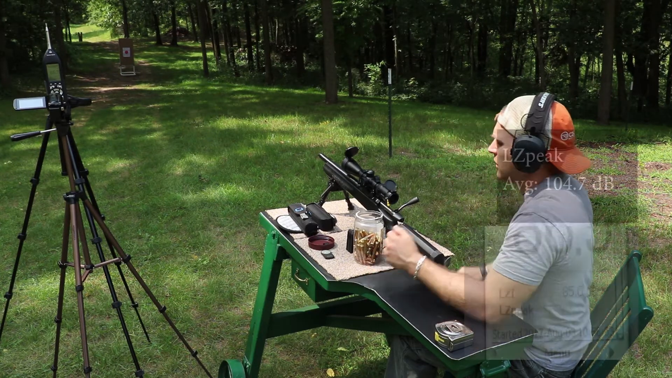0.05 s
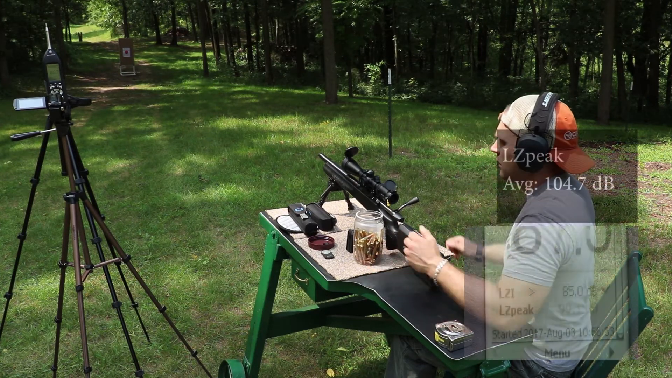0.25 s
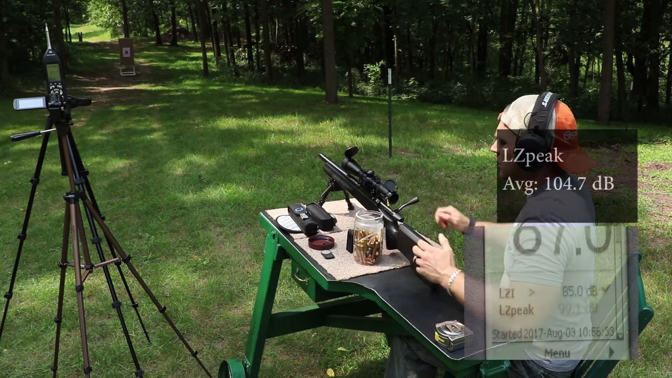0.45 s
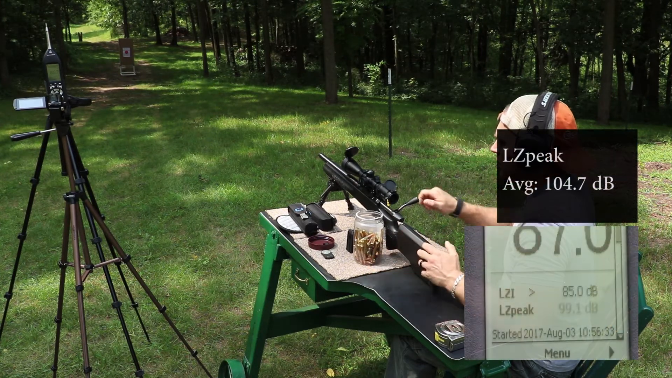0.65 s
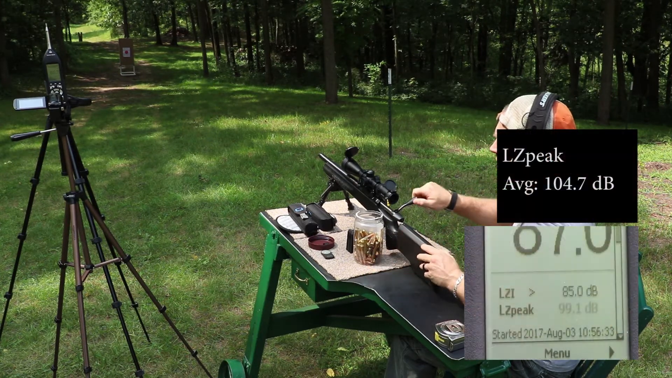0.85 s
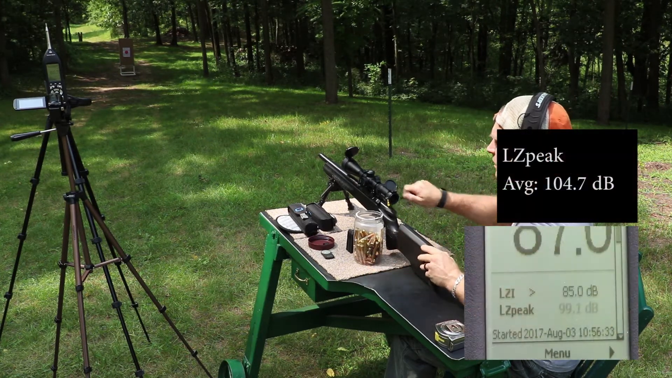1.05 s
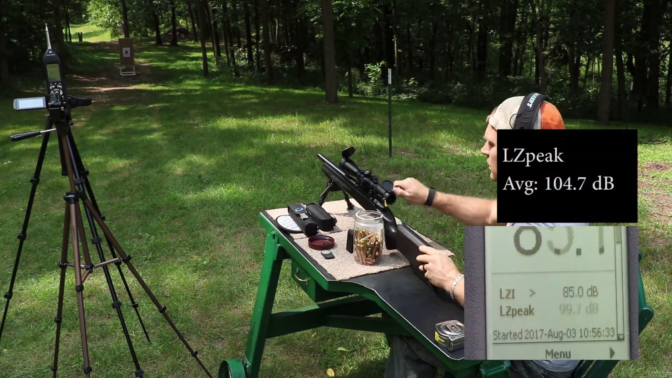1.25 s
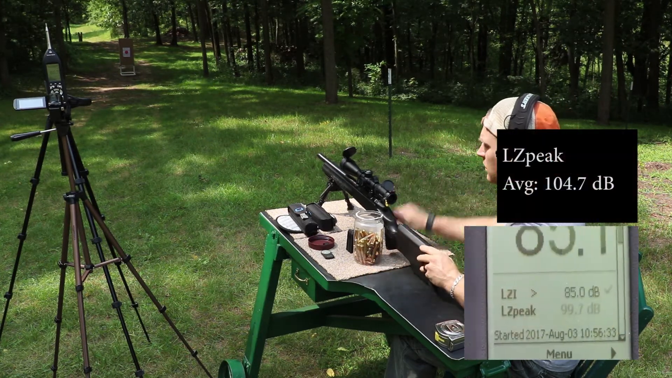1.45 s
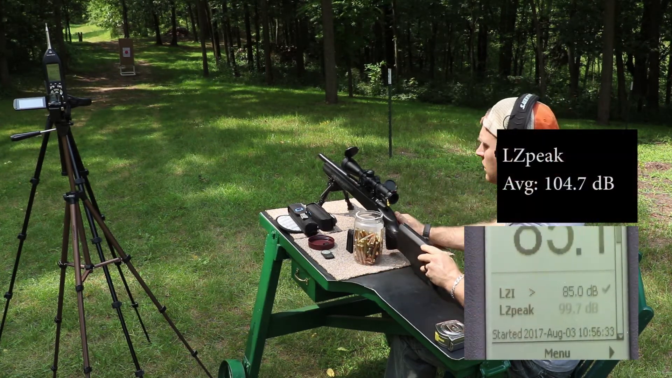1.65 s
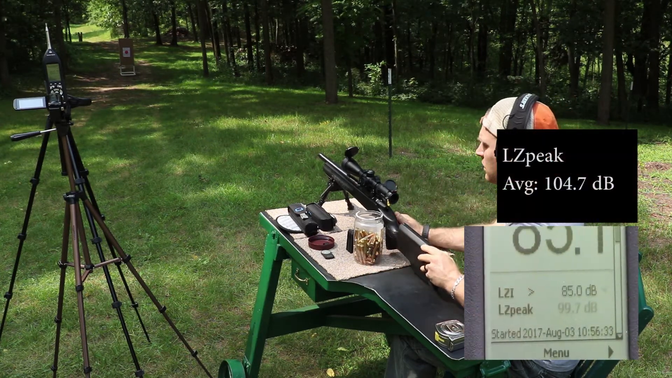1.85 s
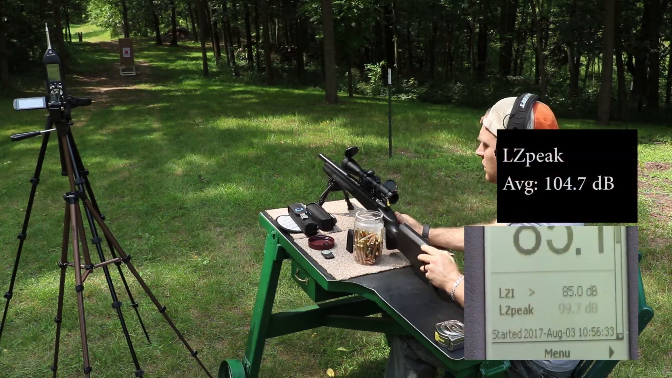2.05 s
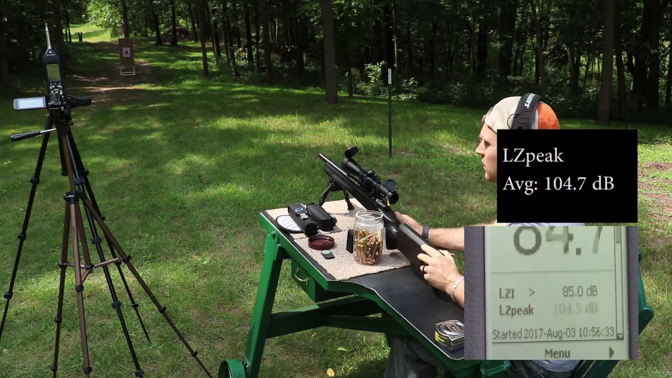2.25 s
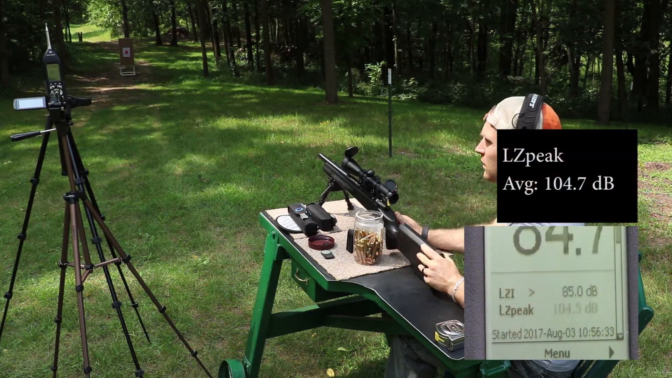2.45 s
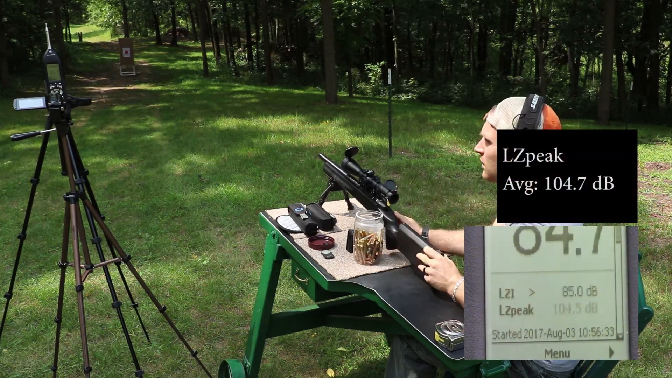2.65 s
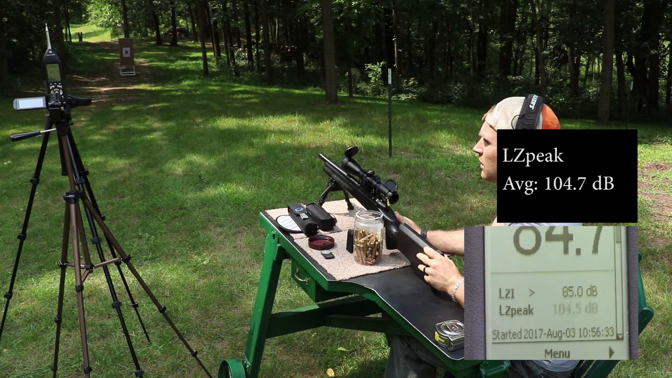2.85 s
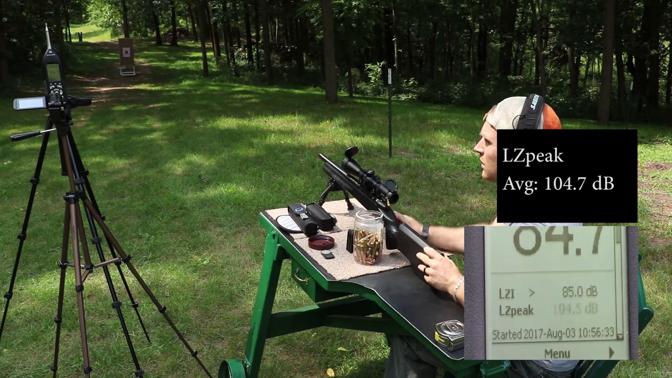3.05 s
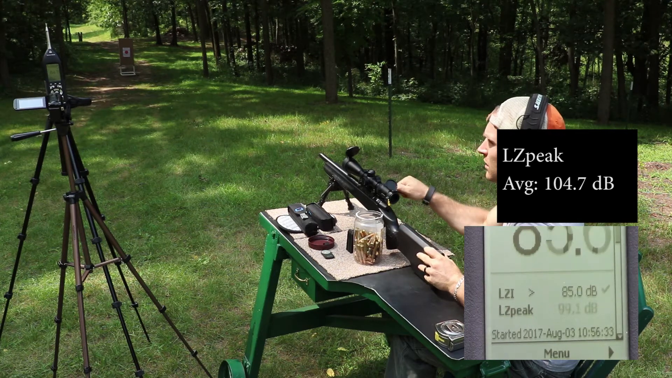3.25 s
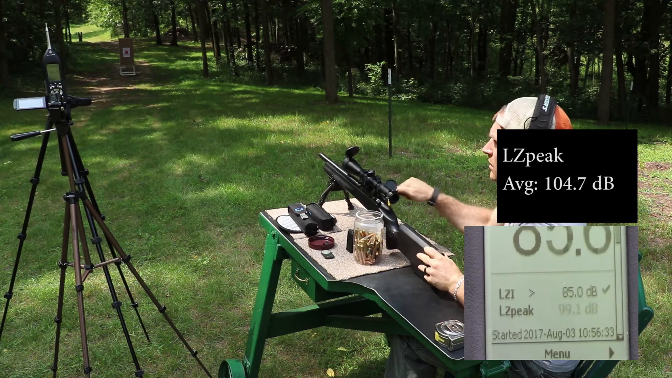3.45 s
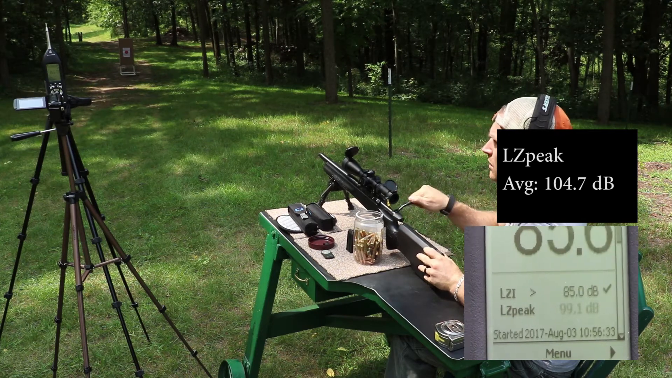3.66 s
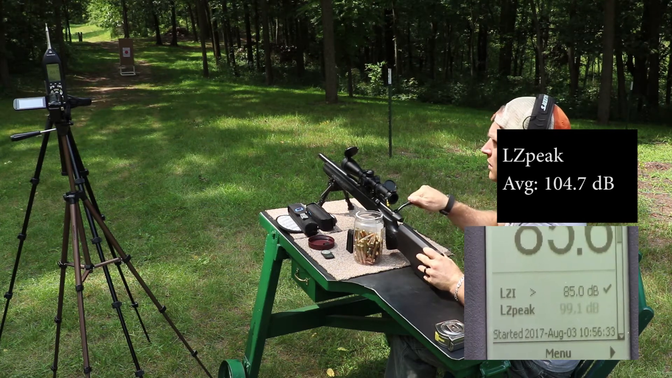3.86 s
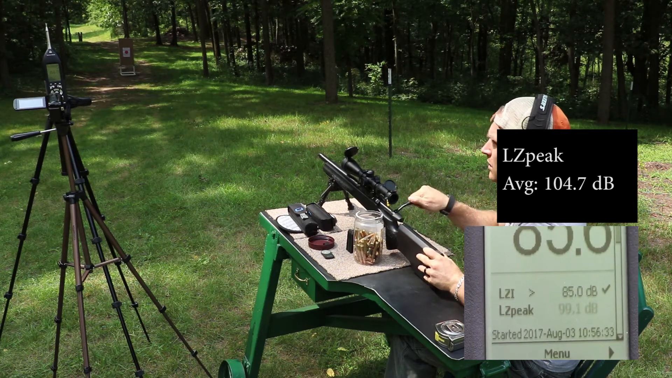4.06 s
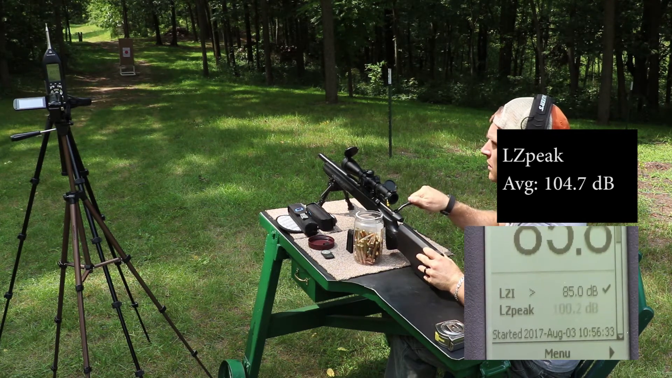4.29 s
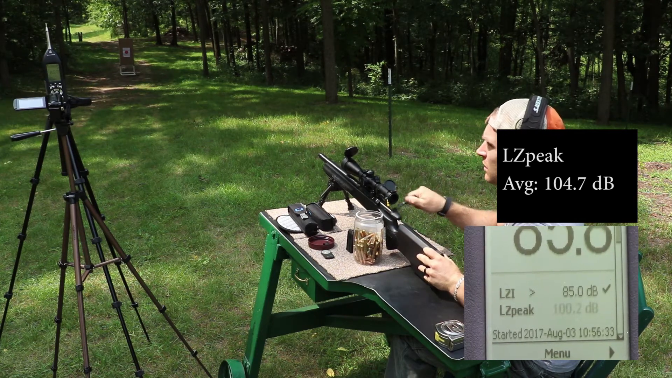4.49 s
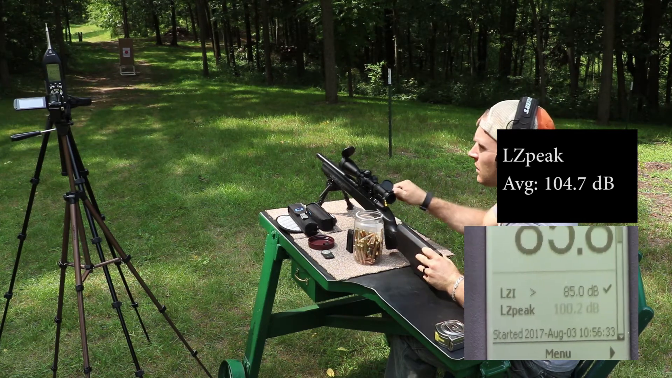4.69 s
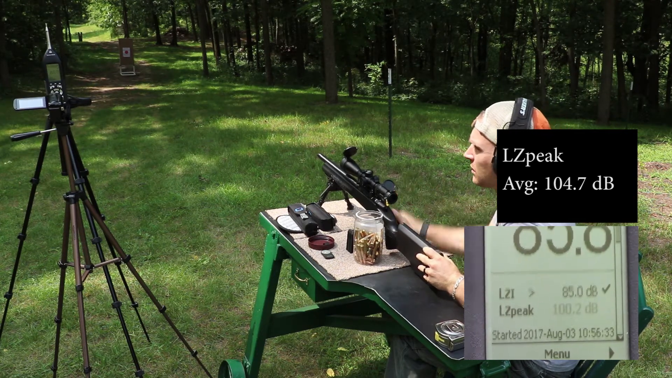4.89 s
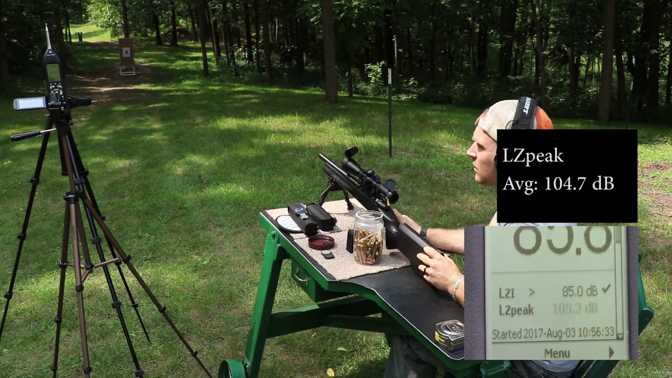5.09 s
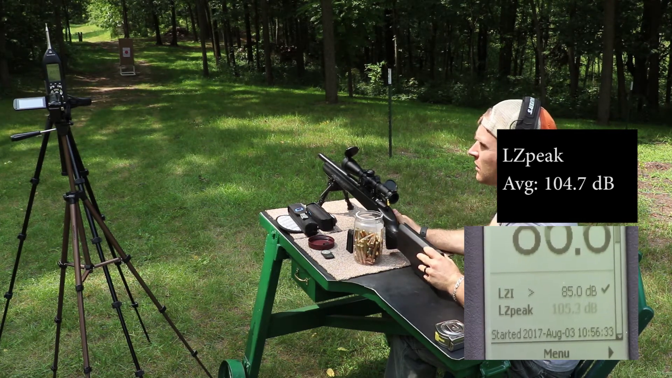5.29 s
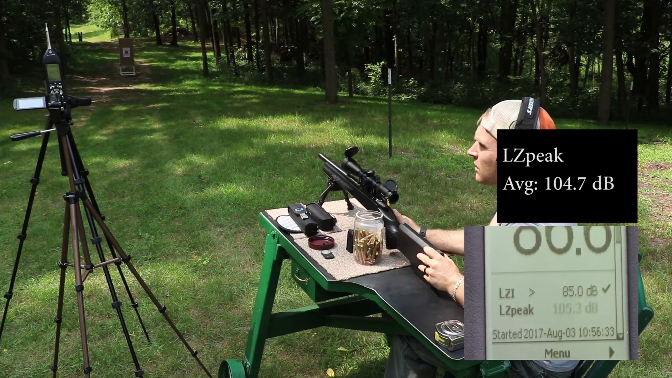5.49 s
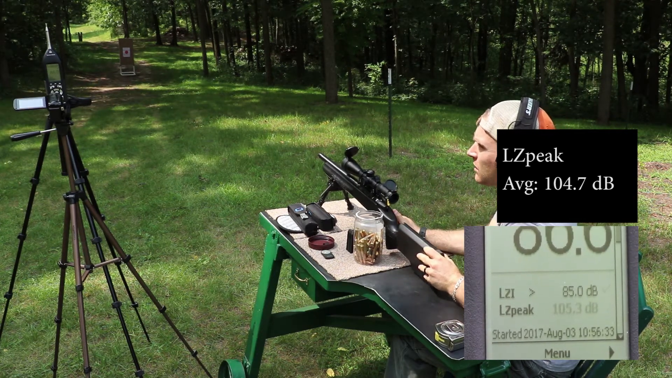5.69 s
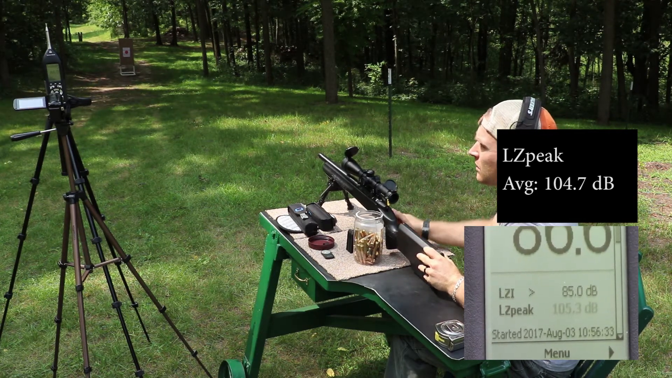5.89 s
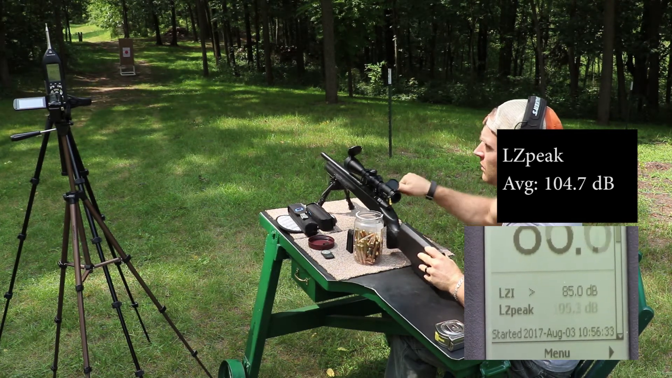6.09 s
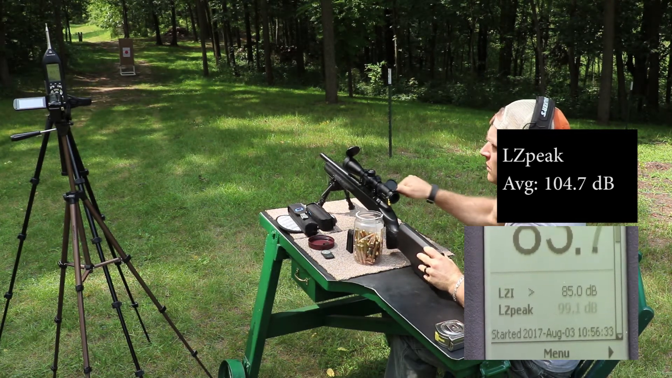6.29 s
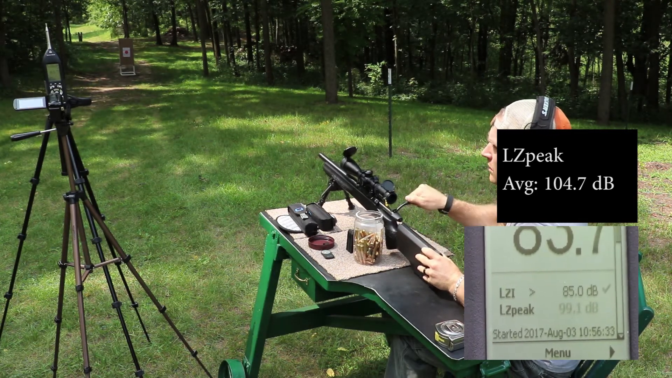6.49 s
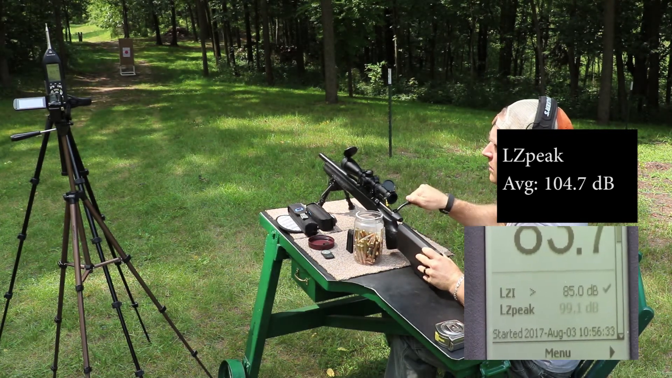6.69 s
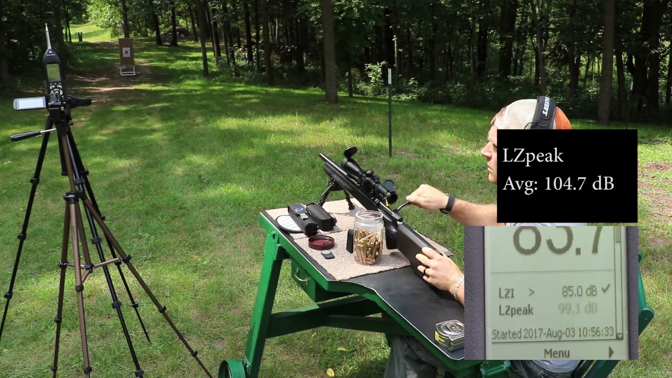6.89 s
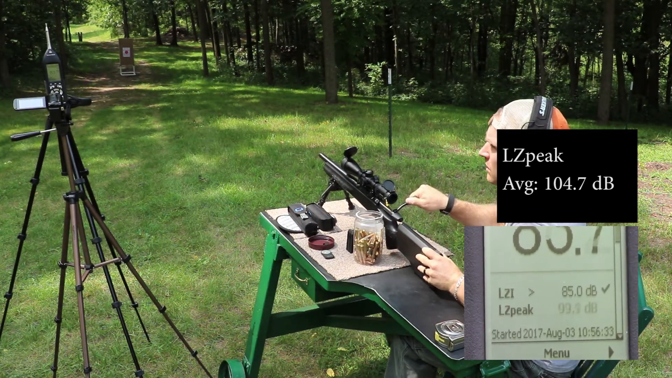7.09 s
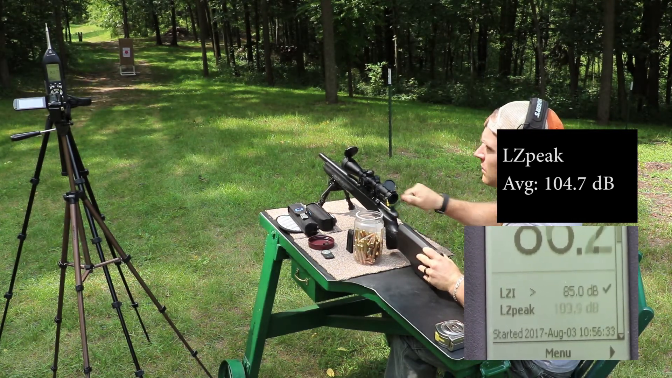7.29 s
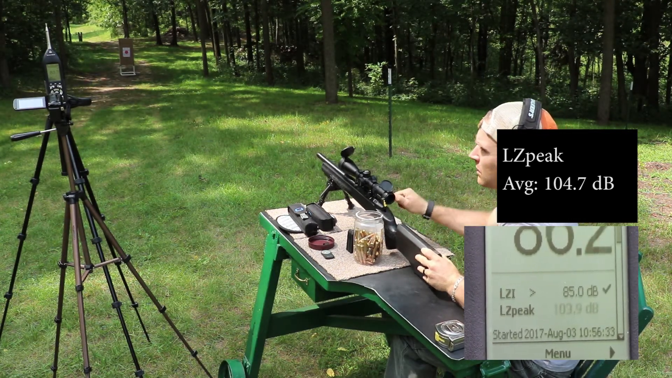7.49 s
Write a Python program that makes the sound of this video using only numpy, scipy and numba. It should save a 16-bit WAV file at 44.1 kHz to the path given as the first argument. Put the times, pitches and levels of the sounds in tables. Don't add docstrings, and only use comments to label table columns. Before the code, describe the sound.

A rifle bolt is worked open and shut on a hollow bench, sharp steel clacks echoing off trees while crickets trill faintly outdoors.

```python
import sys
import numpy as np
from scipy import signal
from scipy.fft import rfft, irfft, next_fast_len
from scipy.io import wavfile
from scipy.ndimage import uniform_filter1d, minimum_filter1d, map_coordinates
from numba import njit

SR = 44100
rng = np.random.default_rng(int(sys.argv[2]) if len(sys.argv) > 2 else 0)


def master(y):
    cut = np.clip(np.atleast_2d(y).T, -1, 1)
    pcm = np.round(cut * 32767)
    wavfile.write(sys.argv[1], SR, pcm.astype(np.int16))


def amplitude_ratio(level_db):
    exponent = np.asarray(level_db, float) / 20
    return 10 ** exponent


N = 332514

# (frequency [Hz], width [Hz], level [dB])
FORWARD_MODES = [(940, 170, -8.5), (1323, 200, 9), (2140, 400, -1), (3180, 287, -14), (3750, 100, -3),
                 (4500, 300, -3), (5750, 530, -1.5), (7050, 1300, -13.5), (10630, 1500, -2.5),
                 (10970, 490, -7)]
# (start [s], end [s], force [dB], hardness [dB])
BACK_STROKES = [
    (3.517, 3.6154, 0, -1),
    (6.3713, 6.461, 0.0038, 1),
]
FORWARD_STROKES = [
    (1.067, 1.174, 0, 0),
    (4.5525, 4.649, 1, -1),
    (7.302, 7.4285, 0, -1),
]


def unit(x):
    return x / np.sqrt(np.mean(x ** 2) + 1e-20)


def along(points, hz, column=1):
    rows = np.transpose(points)
    return np.interp(np.log(hz + 1), np.log(rows[0] + 1), rows[column])


def curves(rows, outside=None):
    s, *cols = np.transpose(rows)
    return [np.interp(np.arange(N) / SR, s, c, outside, outside) for c in cols]


def wobble(rate):
    knots = rng.standard_normal(int(N * rate / SR) + 4)
    return map_coordinates(knots, [np.arange(N) * rate / SR])


def filtered(x, response):
    n = x.shape[-1]
    m = next_fast_len(n + 4096)
    return irfft(rfft(x, m) * response(np.fft.rfftfreq(m, 1 / SR)), m)[..., :n]


def add(track, s, sound):
    part = track[..., max(round(s * SR), 0):][..., :sound.shape[-1]]
    part += sound[..., :part.shape[-1]]


def ring(f, hz, width):
    return 1j * f * width / (hz * hz - f * f + 1j * f * width)


def modes(rows, lo, hi, broad_db):
    hump = lambda f: ring(f, np.sqrt(lo * hi), hi - lo)
    peaks = lambda f: sum(amplitude_ratio(db) * ring(f, hz, width) for hz, width, db in rows if lo < hz <= hi)
    return lambda f: hump(f) ** 2 * (amplitude_ratio(broad_db) * hump(f) + peaks(f))


def rush(spectrum, patchy_db):
    # (frequency [Hz], left-right likeness [correlation])
    likeness = [(60, 0.8), (180, 0.73), (550, 0.72), (1650, 0.74), (4970, 0.43), (15000, 0.043)]
    # (frequency [Hz], left-right difference [dB])
    balance = [(60, 2.5), (180, 0.5), (550, 0), (1650, -2.5), (4970, -1), (15000, 1)]
    z = signal.stft(rng.standard_normal((2, N + 512)), nperseg=512)[2]
    patches = uniform_filter1d(rng.standard_normal(z.shape[1:]), size=6, axis=0)
    patches = uniform_filter1d(patches, size=14, axis=1)
    pair = signal.istft(z * amplitude_ratio(patchy_db * unit(patches)), nperseg=512)[1][:, :N]
    turn = lambda hz: np.arccos(np.clip(along(likeness, hz), 0, 1)) / 2
    mid_side = lambda hz: amplitude_ratio(along(spectrum, hz)) * [np.cos(turn(hz)), np.sin(turn(hz))]
    mid, side = filtered(pair, mid_side)
    lean = lambda hz: amplitude_ratio(along(balance, hz) * np.array([[.5], [-.5]]))
    return unit(filtered(np.array([mid + side, mid - side]), lean))


def air():
    # (frequency [Hz], density [dB per Hz])
    rumble_spectrum = [(12, -31), (22, -2.5), (45, -2.5), (113, 0.5), (184, -6), (330, -14.5), (520, -36),
                       (880, -120)]
    # (frequency [Hz], density [dB per Hz])
    hush_spectrum = [(120, -34), (200, -3.5), (380, 0.5), (900, -4.5), (1940, -10), (7540, -17.5),
                     (9060, -21.5), (16000, -27.5)]
    swell_db = 0.29 * wobble(1.66) + 0.38 * wobble(4.6)
    rumble = amplitude_ratio(-46 + swell_db) * rush(rumble_spectrum, patchy_db=0.94)
    hush = amplitude_ratio(-48 + 1.2 * wobble(1.09)) * rush(hush_spectrum, patchy_db=.3)
    return rumble + hush


def chirps(rows, length, droop, scatter_db):
    track, u = np.zeros((2, N)), np.linspace(-1, 1, round(length * SR))
    for (s, db, hz, pan), luck in zip(rows, rng.standard_normal((len(rows), 4))):
        pitch = hz * (1 + 0.0015 * luck[0]) * (1 - droop * (u + 0.2) ** 2)
        beat = 1 + 0.38 * np.sin(4 * u + 3 * luck[1])
        tone = np.sqrt(1 - u ** 4) * beat * np.sin(2 * np.pi * np.cumsum(pitch) / SR)
        level = amplitude_ratio(db + scatter_db * luck[3] + pan * np.array([[.5], [-.5]]))
        add(track, s - length / 2 + 0.0019 * luck[2], level * tone)
    return track


def trill(phrases, slowing_s, warm_up, shy_db, shy_hz, pan_db):
    rows = []
    for start, end, gaps, db, hz in phrases:
        k = np.arange(gaps + 1)
        s = start + (end - start) * k / gaps - slowing_s / 2 * k * (gaps - k)
        cold = np.exp(-k / warm_up)
        strokes = zip(s, db - shy_db * cold, hz - shy_hz * cold, pan_db + 0 * k)
        rows += [row for row in strokes if row[0] > .012]
    return rows


def crickets():
    # (start [s], end [s], gaps between strokes [count], level [dB], top frequency [Hz])
    near_phrases = [
        (-2.032, .722, 45, -52, 7300),
        (5.082, 7.53, 40, -51, 7280),
    ]
    high_phrases = [
        (1.716, 4.108, 43, -59, 8750),
        (6.707, 7.266, 10, -60, 8650),
    ]
    hidden_phrases = [
        (4.18, 5.743, 28, -60, 8500),
    ]
    # (time [s], level [dB])
    chorus = [
        (0, -55),
        (.8, -54.5),
        (1.4, -55),
        (4.85, -54.5),
        (5.4, -56.5),
        (7.54, -56),
    ]
    level_db, = curves(chorus)

    luck = rng.random((520, 3))
    s = luck[:, 0] * N / SR
    far_db = level_db[(s * SR).astype(int)] - 6.0
    far = np.transpose([s, far_db, 7000 + 1200 * luck[:, 1], 4 + 10 * (luck[:, 2] - .5)])
    far = chirps(far, length=0.018, droop=0.049, scatter_db=2.5)
    band = [(6300, -36), (7000, -3.5), (7700, -2), (8200, -7), (8800, -26)]  # (Hz, dB per Hz)
    blur = amplitude_ratio(level_db - 3.5) * rush(band, patchy_db=1.6)

    near = trill(near_phrases, 1.4e-4, warm_up=3.6, shy_db=8, shy_hz=236, pan_db=-1.2)
    near = chirps(near, length=.023, droop=0.085, scatter_db=-0.2)
    high = trill(high_phrases, 1e-4, warm_up=16, shy_db=10, shy_hz=260, pan_db=-15.0)
    high += trill(hidden_phrases, 1.35e-4, warm_up=3.4, shy_db=-4.0, shy_hz=-100, pan_db=-9)
    high = chirps(high, length=.018, droop=.03, scatter_db=.8)
    return amplitude_ratio(2.0) * near + amplitude_ratio(1.5) * high + far + blur


def trees(x):
    # (frequency [Hz], t60 [s], level [dB])
    decay = [(297, 0.18, 21), (970, 0.64, -2), (1610, 0.74, 5), (2400, 0.74, 5.5), (4350, 0.62, 5.5),
             (8500, 0.48, 5), (14100, 0.34, 0.5)]
    hz, t, z = signal.stft(rng.standard_normal((2, SR)), SR, nperseg=256)
    z[1] = 0.68 * z[0] + 0.86 * z[1]
    fade = amplitude_ratio(along(decay, hz, column=2)[:, None] - 60 * t / along(decay, hz)[:, None])
    build_up = 1 - np.exp(-(t / 0.065) ** 3)
    tail = signal.istft(z * fade * build_up, SR, nperseg=256)[1]
    return signal.fftconvolve(x[None], tail / np.linalg.norm(tail[0]), axes=1)[:, :N]


def scrape():
    fastest, grip_s, stick_s = 0.77, 0.006, 0.026
    t, levels = np.arange(N) / SR, np.full((2, N), -120.)
    for s, end, db, _ in BACK_STROKES + FORWARD_STROKES:
        u = (t - s) / (end - s)
        speed_db = db - np.where(u < fastest, 16 * (1 - u / fastest), 6.5 * (u - fastest) / (1 - fastest))
        grip_db = -14 * np.clip(1 - (t - s) / grip_s, 0, 2)
        stick_db = 16 * np.exp(-np.abs(t - s) / stick_s)
        low_mid_db = grip_db + np.array([-34 + 1.84 * speed_db + stick_db, -34 + speed_db])
        on = (t > s - grip_s / 2) & (u < 1)
        levels[:, on] = low_mid_db[:, on]
    return levels


def slides():
    # (frequency [Hz], width [Hz], level [dB])
    rail_modes = [(1270, 200, 0), (2300, 250, -2), (3450, 220, 1), (4950, 250, 1), (6200, 350, -2),
                  (6950, 250, -1), (8050, 400, -3), (10400, 800, 0), (13000, 2500, -5)]
    low_db, mid_db = scrape()
    z = signal.stft(rng.standard_normal((3, N + 256)), nperseg=256)[2]
    squeaks = uniform_filter1d(rng.standard_normal(z.shape), size=2, axis=1)
    squeaks = uniform_filter1d(squeaks, size=10, axis=2)
    grit = signal.istft(z * amplitude_ratio(3 * unit(squeaks)), nperseg=256)[1][:, :N] * amplitude_ratio(1.2 * wobble(300))
    levels = low_db, mid_db, mid_db - 14 + .3 * (mid_db + 39)
    bands = (600, 2900), (2900, 8300), (8300, 15000)
    return sum(amplitude_ratio(db) * unit(filtered(x, modes(rail_modes, *band, broad_db=-3)))
               for x, db, band in zip(grit, levels, bands))


def contacts(events, body, low_hz, broad_db, punch, linger, thump_db, echo_db, glint_db):
    # (time [s], t60 [s])
    bench_t60 = [
        (1.5, .15),
        (5, .095),
    ]
    track, slow, t = np.zeros((2, N)), np.arange(8192) / SR, np.arange(3072) / SR
    blow = 1.0 * (np.arange(len(t)) == 8)
    tone = lambda hz: np.sin(2 * np.pi * hz * slow)
    hollow = tone(306) + 0.46 * tone(330)
    thud = amplitude_ratio(-60 * slow / 0.06) * (0.9 * tone(235) + 0.8 * tone(480))
    life_ms = linger * 23
    for s, stock_db, steel_db in events:
        struck = body * (1 + rng.normal(0, [.015, .1, 0], (len(body), 3)))
        struck = struck + rng.normal(0, [0, 0, 2], (len(body), 3))
        corner_hz = 8000 * 2 ** ((steel_db - stock_db) / 2.5)
        soft = 2 ** (-min(stock_db, 0) / 32)
        wood = modes(struck, low_hz, 2840, broad_db)
        metal = lambda f: modes(struck, 2600, 14900, broad_db)(f) / (1 + 1j * f / corner_hz) ** 2

        bench_fade = amplitude_ratio(-60 * slow / np.interp(s, *np.transpose(bench_t60)))
        bench = (bench_fade * hollow + thud) * (1 - np.exp(-slow / 0.0048))
        add(track, s, amplitude_ratio(stock_db + thump_db) * np.array([bench, bench]))

        stock = stock_db, wood, life_ms, punch, -20.5, echo_db
        steel = steel_db, metal, 0.74 * life_ms, 3, -47, echo_db + glint_db
        for db, shape, life, kick, settle_db, far_db in (stock, steel):
            fade = amplitude_ratio(-60000 * t / life) + amplitude_ratio(settle_db - 60000 * t / (3 * life))
            rattle = rng.standard_normal(len(t)) * fade * (1 - np.exp(-t / (soft * 0.00027)))
            near, wide = filtered(np.array([rattle + kick / soft * blow, blow]), shape)
            near = near * amplitude_ratio(db) / np.max(np.abs(near))
            wide = wide * np.linalg.norm(near) / np.linalg.norm(wide)
            add(track, s, np.array([near, amplitude_ratio(far_db) * wide]))
    return track


def moves(rows, pattern):
    return [(s + share * (end - s), db + stock_db, db + hard_db + steel_db)
            for s, end, db, hard_db in rows for share, stock_db, steel_db in pattern]


def handle_up():
    # (frequency [Hz], width [Hz], level [dB])
    lift_modes = [(875, 200, -4), (1274, 110, 1.5), (2220, 220, 2.5), (3380, 1900, 27), (4370, 2800, 26.5),
                  (5150, 1100, -25), (7700, 320, -43), (11600, 5700, 7)]
    # (share of the move [0 = start, 1 = end, negative = before], stock peak [dB], steel peak [dB])
    unlock_pattern = [
        (0, -2, -2),
        (1, -4.5, -12.5),
    ]
    cam_pattern = [
        (-.5, -6, -10),
        (0, 2, 4.5),
        (0.449, -3.5, 3.5),
        (.9, -5, -21),
    ]
    # (start [s], end [s], force [dB], hardness [dB])
    unlock_moves = [
        (3.2545, 3.26, -16.5, 8.5),
        (6.1015, 6.107, -8.5, 1.5),
    ]
    cam_moves = [
        (3.2875, 3.302, -14.5, -1.85),
        (6.1335, 6.1443, -14, 0.35),
    ]
    # (time [s], stock level [dB], hardness [dB])
    nudges = [
        (.056, -33.5, 2),
        (1.461, -29.5, -5),
        (3.151, -35.5, -17),
        (6.214, -30.5, -12),
        (6.238, -24, -7),
        (6.323, -27, -2),
        (7.521, -22, -8),
    ]
    events = moves(unlock_moves, unlock_pattern) + moves(cam_moves, cam_pattern)
    events += [(s, db, db + hard_db) for s, db, hard_db in nudges]
    return contacts(events, lift_modes, low_hz=510, broad_db=0.5, punch=0.69, linger=1.0,
                    thump_db=-23, echo_db=0.5, glint_db=-3)


def bolt_back():
    # (frequency [Hz], width [Hz], level [dB])
    back_modes = [(774, 180, -4.5), (1161, 247, 0), (1422, 160, -1), (1540, 56, 5.5), (1865, 74, -10),
                  (2220, 110, -3), (3770, 250, -4), (4450, 190, 2.5), (7500, 460, -3), (9820, 700, -2),
                  (11330, 780, -2.5), (13100, 1100, 7)]
    # (share of the stroke [0 = start, 1 = stop, above 1 = after], stock peak [dB], steel peak [dB])
    back_pattern = [
        (0, -16.5, -26),
        (.12, -23, -31.5),
        (0.169, -28, -38),
        (0.531, -24, -29),
        (0.666, -22, -41),
        (0.916, -19.5, -21),
        (1, 0.5, 4),
        (1.105, -14.5, -28),
    ]
    return contacts(moves(BACK_STROKES, back_pattern), back_modes, low_hz=420, broad_db=-12.5, punch=4.06,
                    linger=1.0, thump_db=-18, echo_db=3.5, glint_db=-1.5)


def bolt_forward():
    # (share of the stroke [0..1], stock peak [dB], steel peak [dB])
    forward_pattern = [
        (0, -25, -36),
        (0.938, -24, -22),
        (1, -0.5, 7.5),
    ]
    return contacts(moves(FORWARD_STROKES, forward_pattern), FORWARD_MODES, low_hz=760, broad_db=-3, punch=0.5,
                    linger=1.13, thump_db=-35, echo_db=2.5, glint_db=-0.5)


def handle_down():
    # (frequency [Hz], width [Hz], level [dB])
    lock_modes = [(620, 260, 4), (874, 67, -4), (1253, 260, 7), (1880, 140, -13), (2480, 67, -6),
                  (3020, 330, -3.5), (3770, 400, -7.5), (4960, 320, -1.5), (6250, 410, 3.5),
                  (9300, 1500, -1), (11300, 790, 7)]
    # (share of the move [0..1], stock peak [dB], steel peak [dB])
    turn_pattern = [
        (0, -12.5, -25),
        (.775, -19.5, -28),
    ]
    seat_pattern = [
        (1, 1.17, -2.7),
    ]
    # (start [s], end [s], force [dB], hardness [dB])
    turn_moves = [
        (1.482, 1.5355, 0, 0),
        (4.908, 4.963, 0, 0),
    ]
    lugs = contacts(moves(turn_moves, turn_pattern), FORWARD_MODES, low_hz=766, broad_db=3.5, punch=7,
                    linger=0.94, thump_db=-21, echo_db=8, glint_db=0)
    seat = contacts(moves(turn_moves, seat_pattern), lock_modes, low_hz=406, broad_db=-4.5, punch=16,
                    linger=1.13, thump_db=-12, echo_db=-6, glint_db=7.5)
    return lugs + seat


def scene():
    rifle = slides() + handle_up() + bolt_back() + bolt_forward() + handle_down()
    side = np.array([[-1], [1]])
    lead = lambda hz: amplitude_ratio(.3 * side) * np.exp(1j * side * hz * 3e-5)
    direct = filtered(rifle[[0, 0]], lead)
    return direct + amplitude_ratio(-27.5) * trees(rifle[1]) + crickets() + air()


@njit
def follow(want_db, fall, rise):
    gain_db, g = np.zeros_like(want_db), 0.0
    for i in range(len(want_db)):
        g += (want_db[i] - g) * (fall if want_db[i] < g else rise)
        gain_db[i] = g
    return gain_db


def roll_off(x):
    return signal.sosfilt(signal.butter(12, 16310, fs=SR, output="sos"), x)


def record(dry):
    over_db = np.maximum(20 * np.log10(np.max(np.abs(dry), axis=0) + 1e-9) + 9, 0)
    hold = round(.022 * SR)
    want_db = minimum_filter1d(-.9 * over_db, hold, origin=(hold - 1) // 2)
    x = dry * amplitude_ratio(follow(want_db, 1 / (0.017 * SR), 1 / (0.029 * SR)))
    x = x / (1 + np.abs(x) ** 8) ** (1 / 8)
    return roll_off(x)


dry = scene()
out = record(dry)
master(out)
```